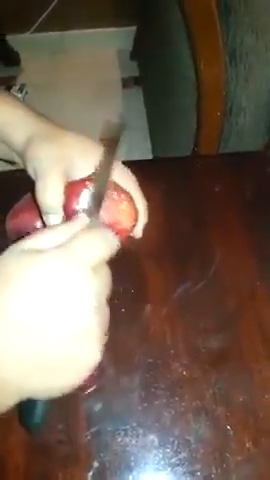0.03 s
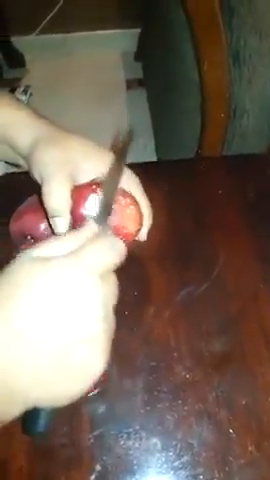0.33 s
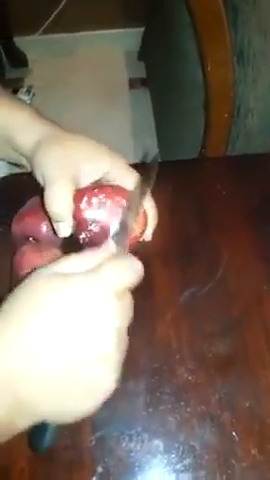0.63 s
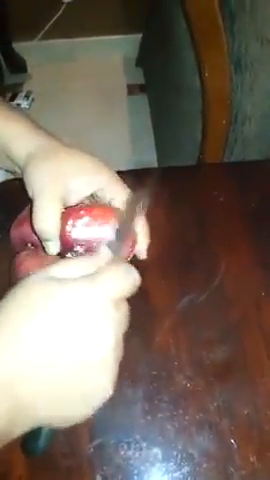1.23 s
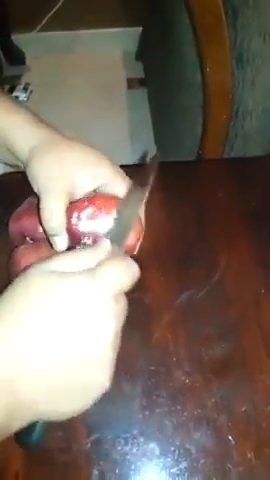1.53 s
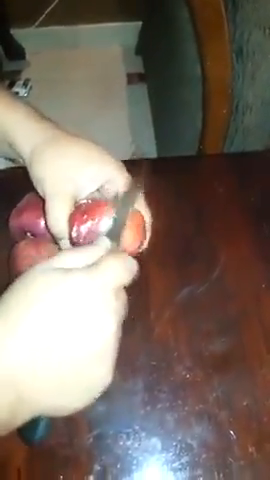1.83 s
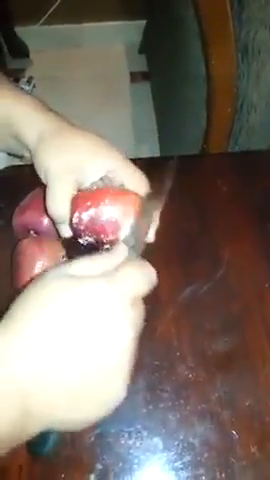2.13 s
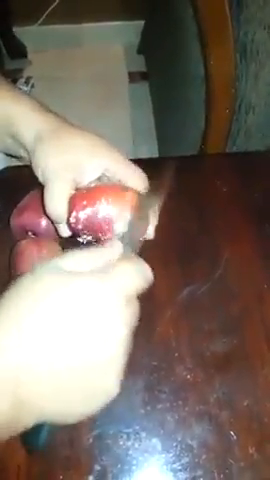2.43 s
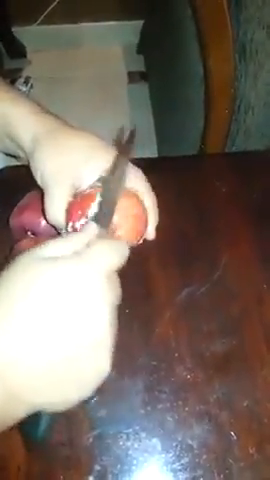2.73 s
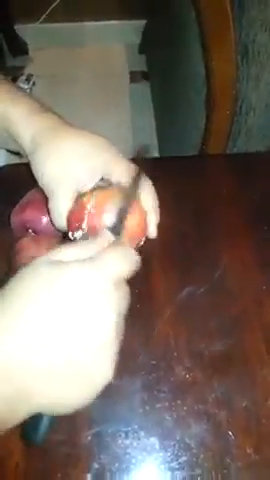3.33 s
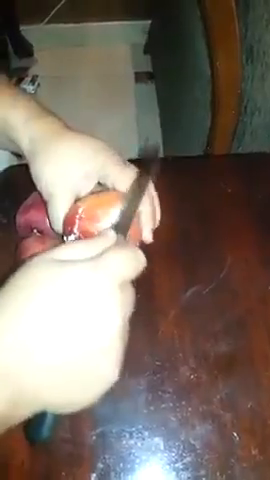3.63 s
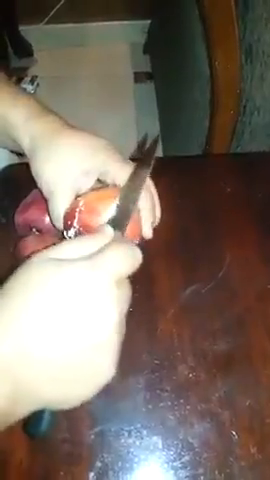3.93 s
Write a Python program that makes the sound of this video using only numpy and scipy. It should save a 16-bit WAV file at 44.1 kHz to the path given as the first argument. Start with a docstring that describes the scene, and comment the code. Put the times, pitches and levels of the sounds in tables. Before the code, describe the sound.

Rapid, raspy knife strokes scrape an apple's skin over a steady machine drone.

```python
"""A knife scrapes quickly to and fro over an apple, about four times a second each way.
Its edge catches and slips on the skin; the tiny slips ring the damped blade and tear off a fine hiss.
The fruit adds a dull rub, and now and then there is a brief, soft, low swell of noise.
Behind it, in the same small room, a fan-like machine drones with rushing air and faint motor whines."""
import sys
import numpy as np
from scipy import signal
from scipy.fft import rfft, irfft
from scipy.io import wavfile

SR = 44100
rng = np.random.default_rng(int(sys.argv[2]) if len(sys.argv) > 2 else 0)


def transcribe(u):
    """Save the signal u as a 16-bit wav file named by the first command-line argument.

    u: samples, shape (n,) or (channels, n), limited to [-1, 1]; the rate is SR.
    q: integer samples, one column per channel.
    """
    v = np.clip(np.atleast_2d(u).T, -1, 1)
    q = np.round(v * 32767).astype(np.int16)
    wavfile.write(sys.argv[1], SR, q)


N = 176400

# Where the machine and the low swells sit, mostly to the right: pitch_hz, left_minus_right_db
SIDE_BALANCE = [(100, -3), (400, -2), (1500, -0.3), (2200, -1.5), (3500, -4.5), (5500, -9.5), (8000, -12.5)]


def knife_strokes():
    """How hard the knife drives low ring, high ring and hiss: each stroke bites, swells, eases, lifts."""
    # One row a stroke: start_s, length_s, low_ring_db, high_ring_db, hiss_db, hardest_point (0 to 1)
    strokes = [ (-.006, 0.081, -37.5, -43, -44, 0.1), (0.122, 0.081, -43.5, -50, -48.5, 0.8),
               (0.235, 0.071, -35.5, -40.5, -44, .25), (0.354, 0.099, -44, -52.5, -49, 0.2),
               (0.472, .076, -37, -45, -42.5, 0.3), (0.615, 0.097, -47, -53, -49, 0.3),
               (0.74, 0.078, -38, -45.5, -42, 0.3), (0.855, 0.08, -44, -46, -45.5, 0.3),
               (0.962, 0.089, -37.5, -43.5, -42, 0.8), (1.111, 0.09, -39.5, -45, -43.5, 0.9),
               (1.243, 0.071, -31.5, -37.5, -41, 0), (1.373, .063, -43, -51, -49, .7),
               (1.5, 0.035, -41.5, -49.5, -56.5, 0.8), (1.608, .064, -41, -52.5, -50, 0.4),
               (1.705, 0.068, -41, -49, -47.5, 0.4), (1.835, 0.12, -44, -53.5, -52.5, 0.1),
               (1.974, 0.084, -35, -43, -44.5, .4), (2.105, 0.052, -45.5, -57, -48, 0.3),
               (2.206, 0.087, -38.5, -43.5, -44.5, 0.5), (2.328, 0.074, -41.5, -53.5, -45, 0.7),
               (2.439, 0.11, -40.5, -48, -44, .4), (2.585, 0.073, -41.5, -53, -50, 0.7),
               (2.699, 0.08, -36.5, -48.5, -44.5, .22), (2.835, .065, -42, -58, -48, .65),
               (2.934, 0.078, -32.5, -38.5, -42.5, 0.3), (3.066, .082, -41.5, -48, -47.5, 0.3),
               (3.177, 0.081, -39.5, -49.5, -46, 0.3), (3.315, .10, -44, -50, -50, 0.5),
               (3.445, 0.02, -34, -51, -53, 0.7), (3.569, 0.031, -40.5, -56, -54.5, 0.7),
               (3.658, 0.031, -31.5, -38.5, -45.5, 0.9), (3.779, 0.035, -36.5, -42.5, -53.5, 0.5),
               (3.868, 0.046, -36, -37, -45, .7)]
    bite_s, lift_s, ends_db, slow_hiss_db = 0.0075, 0.0059, -5, -2
    t = np.arange(N) / SR
    drive = np.ones((3, 1)) * from_db(-64 + 6 * drift(rate_hz=7.4))   # light brushing between strokes
    for start, length, *levels_db, hardest in strokes:
        along = np.clip((t - start) / length, 0, 1)
        bite = np.clip((t - start) / bite_s, 0, 1)
        lift = np.clip((start + length - t) / lift_s + .5, 0, 1)
        swell_db = np.interp(along, [0, np.clip(hardest, .05, .95), 1], [ends_db, 0, ends_db])
        pressure = bite * lift * from_db(swell_db)
        # The hiss weakens where the blade slows to turn around.
        hiss = pressure * from_db(slow_hiss_db * (1 - np.sin(np.pi * along)))
        drive = np.maximum(drive, from_db(levels_db)[:, None] * np.array([pressure, pressure, hiss]))
    return drive


def slips(per_s=5000, spread_db=1.5):
    """Friction as a stream of tiny slips, each a click of uneven size."""
    sizes = from_db(spread_db * np.minimum(rng.exponential(1, N), 5)) * rng.choice([-1, 1], N)
    return sizes * (rng.random(N) < per_s / SR)


def blade_ring(drive):
    """Chattering slips ring the blade; each resonance flickers as the contact point moves."""
    # Resonances of the blade on the fruit: pitch_hz, width_hz, gain_db, left_minus_right_db, left_lead_rad
    resonances = [(2759, 294, -7.5, 6.5, 2.5), (2932, 270, -4, -6, 2), (3158, 310, -8, -9, 3),
                  (3620, 330, -12.5, -7.5, 0.2), (4130, 234, -0.5, -12, 1), (4515, 260, -8, -5, 4.8),
                  (5010, 280, -1.5, 2, 4.5), (5224, 250, -8, 3.5, 5.5), (5830, 560, -5.5, -3, -2),
                  (6320, 270, -10.5, 0.5, -1.2), (6980, 570, -5, 0, 1.3), (7510, 450, -7, -4, -1.5),
                  (7940, 340, -7, -3.5, -3.5)]
    borders_hz = [3700, 4700]   # between low ring, high ring and hiss
    chatter_db, flicker_db = 1, 3
    friction = slips() * from_db(chatter_db * drift(rate_hz=69))
    out = 0
    for hz, width, db, side_db, lead in resonances:
        force = drive[np.searchsorted(borders_hz, hz)]
        flicker = from_db(flicker_db * drift(rate_hz=22))
        ring = resonate(friction * force * flicker, hz, width)
        ear_phases = np.exp(.5j * lead * np.array([[1], [-1]]))   # one ear's wave runs ahead
        ears = np.real(signal.hilbert(ring) * ear_phases)
        out = out + ears * pan(side_db) * from_db(db) * np.sqrt(np.mean(force ** 2))
    return out


def apple_rub(force):
    """The same strokes rub dully in the body of the apple."""
    # Tone color of the rub: pitch_hz, gain_db
    rub_spectrum = [(300, -6), (550, -1.5), (900, -7), (1500, -0.5), (2200, -7), (8000, -22)]
    gains = from_db(at_hz(rub_spectrum, bins()))
    rub = np.array([irfft(rfft(slips()) * gains, N) for _ in range(2)])
    return from_db(-9) * force * unit_power(rub)


def soft_low_swells():
    """Now and then a brief, soft, low swell of noise."""
    # One row a swell: start_s, level_db
    swells = [(.07, -38), (.53, -43), (1.267, -41.5)]
    rise_s, pitch_hz = 0.017, 500
    t, level = np.arange(N) / SR, 0
    for start, db in swells:
        age = np.maximum(t - start, 0) / rise_s
        level = level + from_db(db) * age * np.exp(1 - age)
    return level * resonate(slips(), pitch_hz, width_hz=350) * pan(at_hz(SIDE_BALANCE, pitch_hz))


def room_echo(sound):
    """Short echoes, different at each ear; a blend of six tails keeps shifting as the hands move."""
    fade_s, first_echo_s, echo_db = 0.24, 0.0033, -9.5
    t, out = np.arange(SR // 3) / SR, 0
    shares = np.array([drift(rate_hz=2.1) for _ in range(6)])
    for share in shares / np.linalg.norm(shares, axis=0):
        tail = rng.standard_normal((2, len(t))) * from_db(-60 * t / fade_s) * (t > first_echo_s)
        tail /= np.linalg.norm(tail, axis=1, keepdims=True)
        out = out + signal.fftconvolve(sound * share, tail, axes=1)[:, :N]
    return from_db(echo_db) * out


def machine_drone():
    """The machine's rushing air, spread wide in the treble, with wavering tones standing in it."""
    # Tone color of the rushing air: pitch_hz, gain_db
    air_spectrum = [(25, -26), (60, -15), (125, -16.5), (170, -10.5), (230, 1), (320, -3.5), (450, -2),
                    (620, -1.5), (800, -7), (1200, -7.5), (2000, -16), (3200, -19), (4600, -20),
                    (6000, -25.5), (8000, -38.5)]
    # How alike the air sounds at the two ears: pitch_hz, likeness (0 to 1)
    ear_likeness = [(30, 0.82), (170, 0.94), (350, 0.76), (600, 0.76), (900, .2), (1800, 0.18),
                    (3000, 0.05), (8000, 0.02)]
    # Tones of the drone, each a narrow band of noise: pitch_hz, width_hz, level_db
    drone_tones = [(168.4, 13, -58), (229, 4.4, -50.5), (240.3, 9.6, -51), (292.6, 20, -53),
                   (349.7, 12, -45), (400.7, 5.9, -58), (441, 2.7, -54), (537.2, 21, -50), (671.4, 42, -59),
                   (1060, 4.7, -66)]
    hz = bins()
    mid, side = rfft(rng.standard_normal((2, N)))
    alike = at_hz(ear_likeness, hz)
    ears = np.sqrt(1 + alike) * mid + np.sqrt(1 - alike) * side * [[1], [-1]]
    air = irfft(ears * pan(at_hz(SIDE_BALANCE, hz)) * from_db(at_hz(air_spectrum, hz)), N)
    out = from_db(-39) * unit_power(air)
    for pitch, width, db in drone_tones:
        tone = irfft(rfft(rng.standard_normal(N)) / (1 + 2 * ((hz - pitch) / width) ** 2), N)
        out = out + from_db(db) * unit_power(tone) * pan(at_hz(SIDE_BALANCE, pitch))
    return out


def motor_whines():
    """The motor's faint hum and thin whines, nearly steady."""
    # One row a tone: pitch_hz, level_db
    motor_tones = [(59, -72), (118, -69), (1684, -66.5), (2380, -62), (2439, -66.5)]
    wander_hz, waver_db = 1.5, 2.5
    out = 0
    for hz, db in motor_tones:
        phase = 2 * np.pi * np.cumsum(hz + wander_hz * drift(rate_hz=3.2)) / SR
        level = from_db(db + waver_db * drift(rate_hz=6))
        out = out + np.sqrt(2) * np.sin(phase) * level * pan(at_hz(SIDE_BALANCE, hz))
    return out


def from_db(db):
    """Turn decibels into a gain."""
    return 10 ** (np.asarray(db) / 20)


def unit_power(x):
    """Scale a signal to an average power of 1."""
    return x / np.sqrt(np.mean(x ** 2) + 1e-20)


def at_hz(table, hz):
    """Read between the rows of a table on a log-frequency axis."""
    pitches, values = np.array(table).T
    return np.interp(np.log(hz + 1e-9), np.log(pitches), values)


def bins():
    """The frequencies of the spectrum, in Hz."""
    return np.arange(N // 2 + 1) * SR / N


def pan(db):
    """Left and right gains that keep the total power; positive dB leans left."""
    return np.sqrt(2 / (1 + from_db(np.array([[-2], [2]]) * db)))


def drift(rate_hz):
    """A smooth random wobble of typical size 1, mostly slower than rate_hz."""
    return unit_power(irfft(rfft(rng.standard_normal(N)) / (1 + (bins() / rate_hz) ** 2), N))


def resonate(x, hz, width_hz):
    """Ring in one band of pitches, scaled to a power of 1."""
    band = signal.butter(2, [hz - width_hz / 2, hz + width_hz / 2], "band", fs=SR, output="sos")
    return unit_power(signal.sosfilt(band, x + 1e-18))


def scene():
    """The scraping close by, its echo, and the machine behind."""
    drive = knife_strokes()
    close_sounds = blade_ring(drive) + apple_rub(drive[0]) + soft_low_swells()
    return close_sounds + room_echo(close_sounds) + machine_drone() + motor_whines()


def record(dry):
    """Cut the highest treble steeply."""
    cutoff_hz = 8100
    return signal.sosfilt(signal.ellip(12, .2, 80, cutoff_hz, fs=SR, output="sos"), dry)


dry = scene()
out = record(dry)
transcribe(out)
```